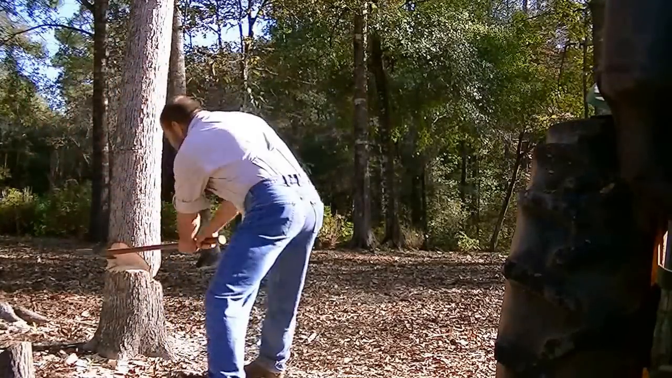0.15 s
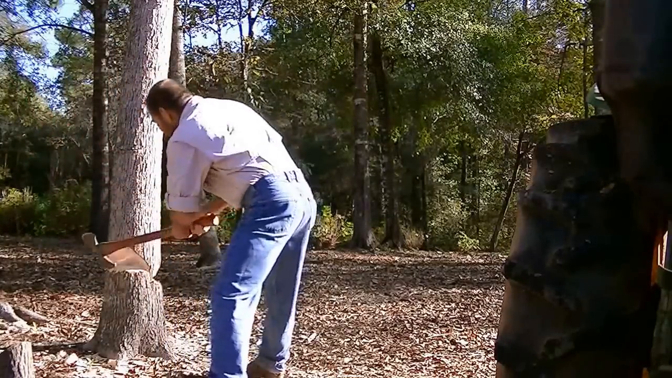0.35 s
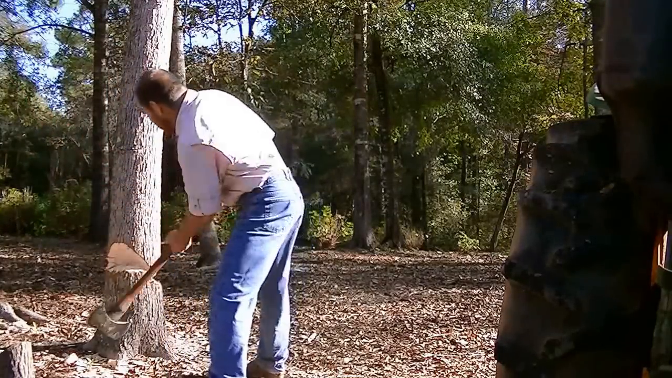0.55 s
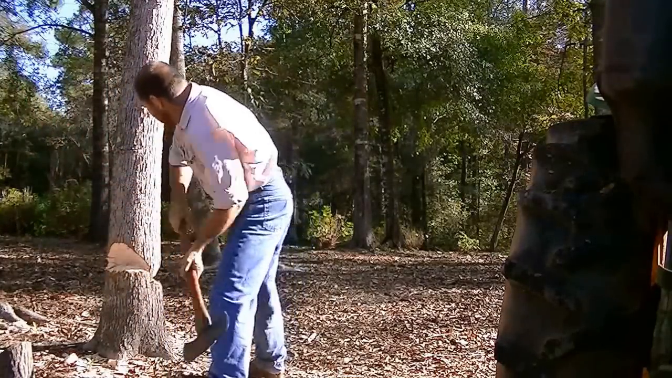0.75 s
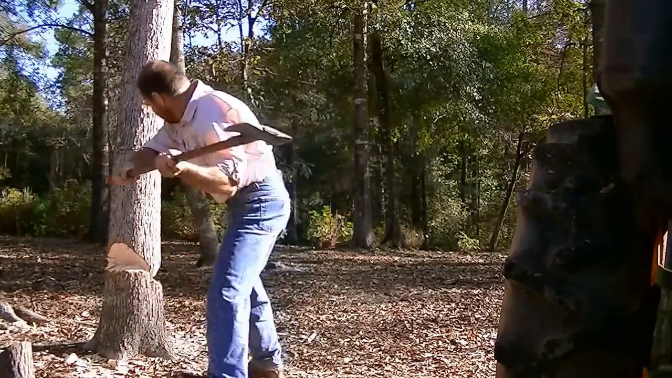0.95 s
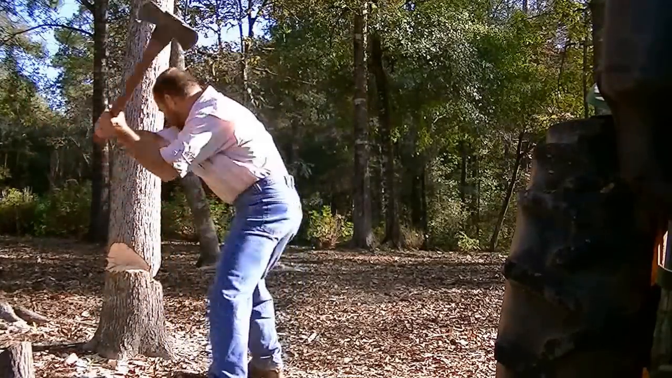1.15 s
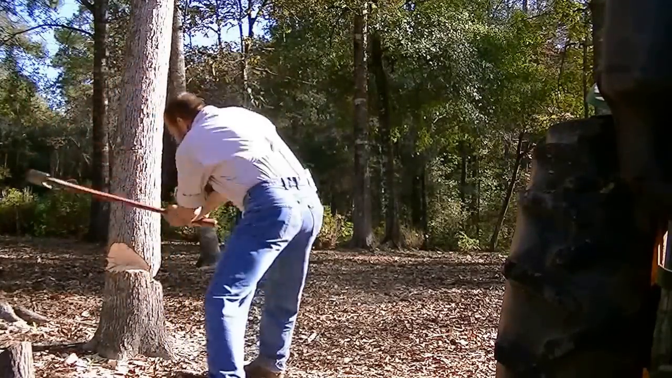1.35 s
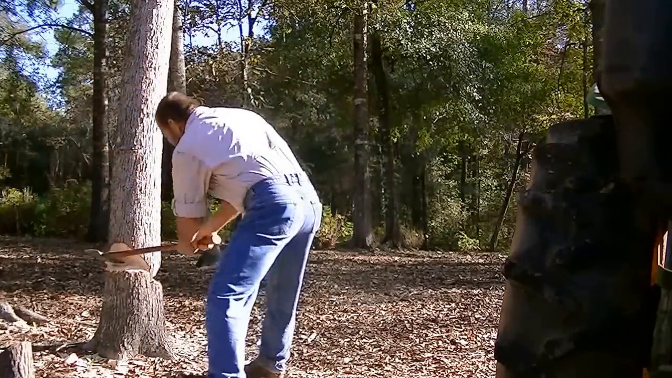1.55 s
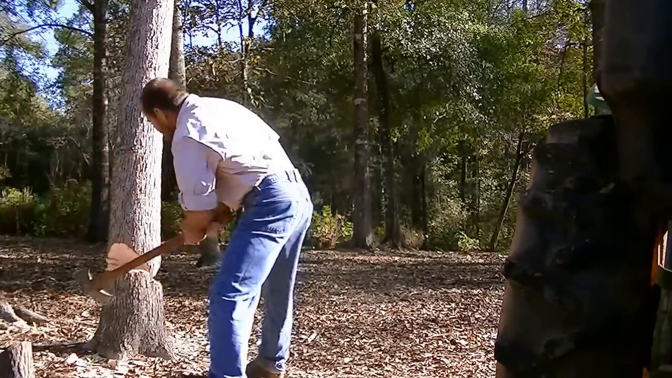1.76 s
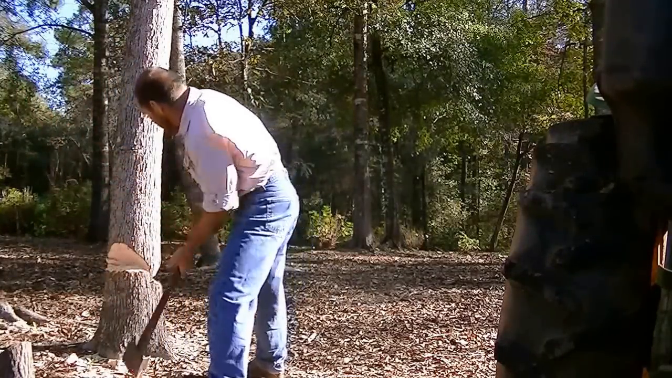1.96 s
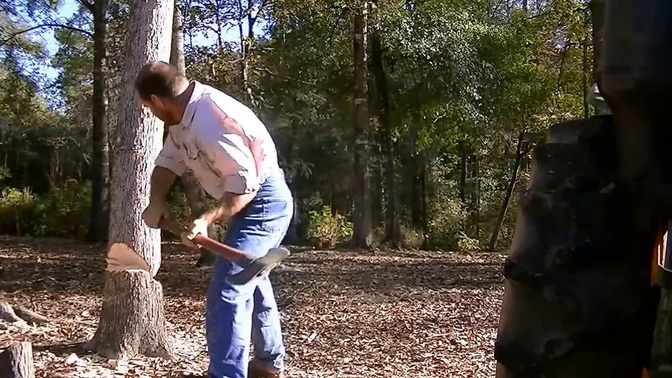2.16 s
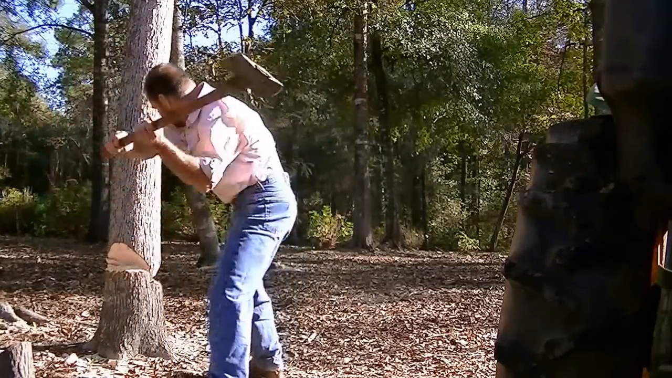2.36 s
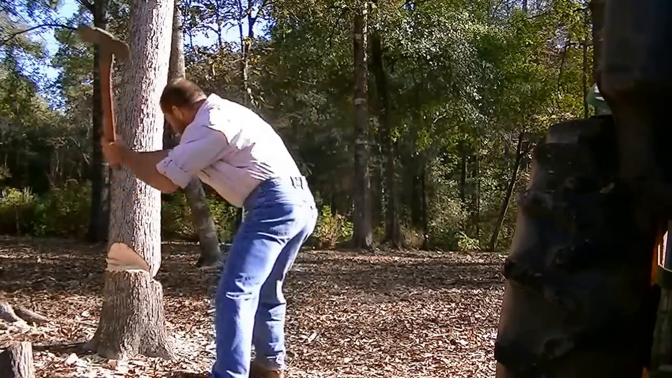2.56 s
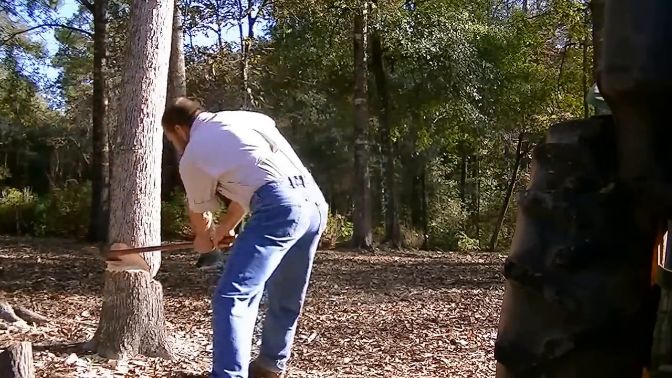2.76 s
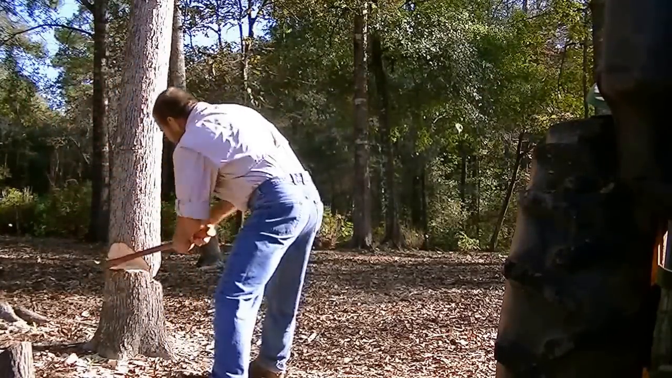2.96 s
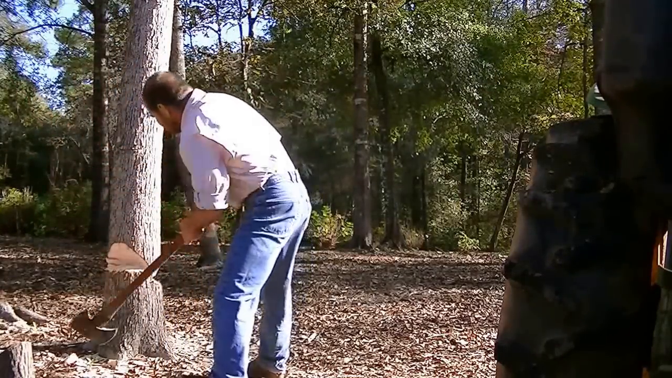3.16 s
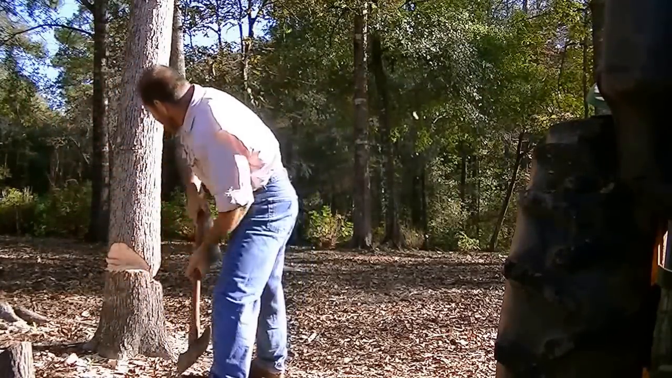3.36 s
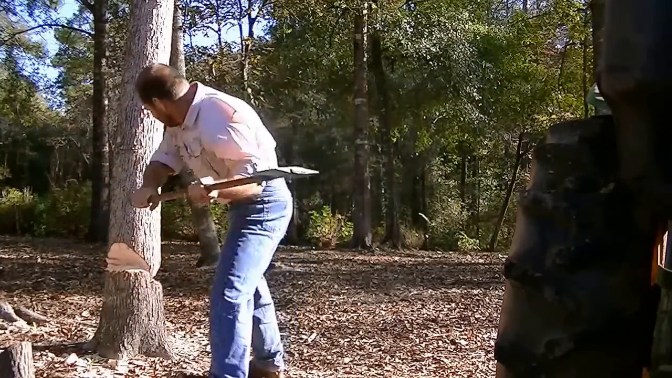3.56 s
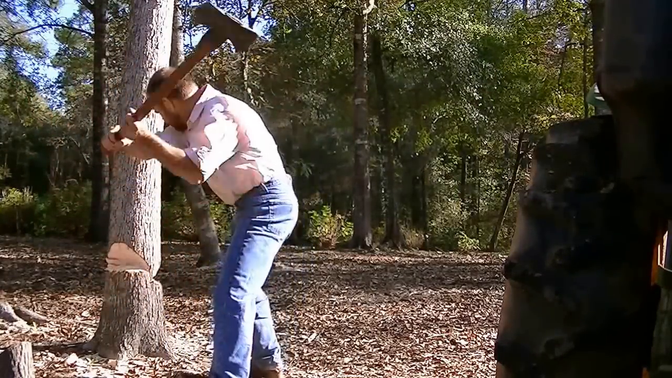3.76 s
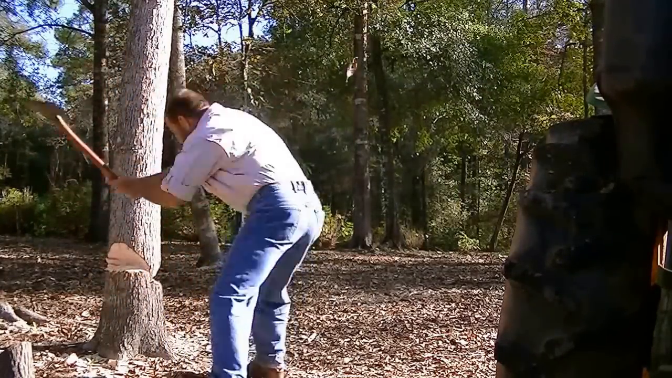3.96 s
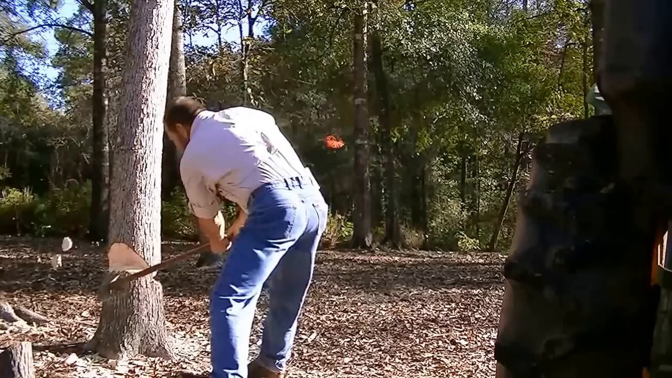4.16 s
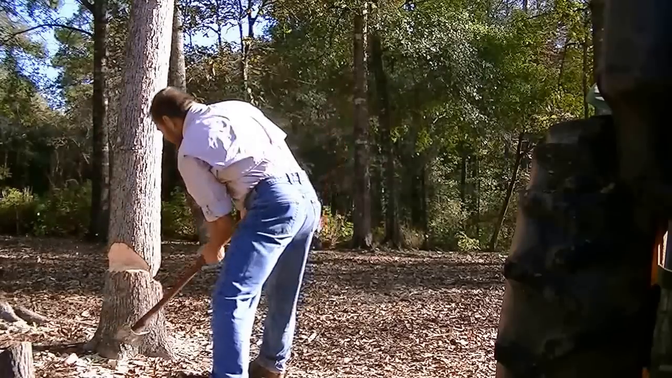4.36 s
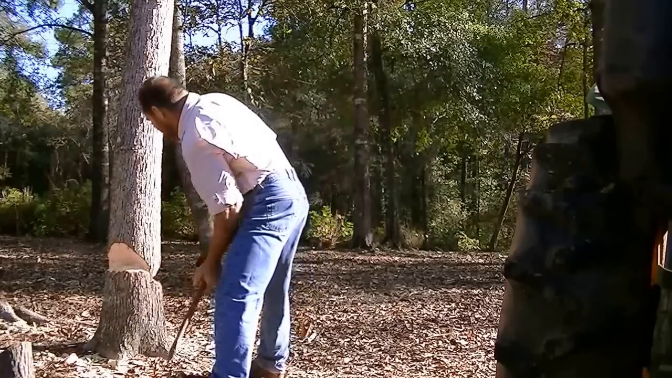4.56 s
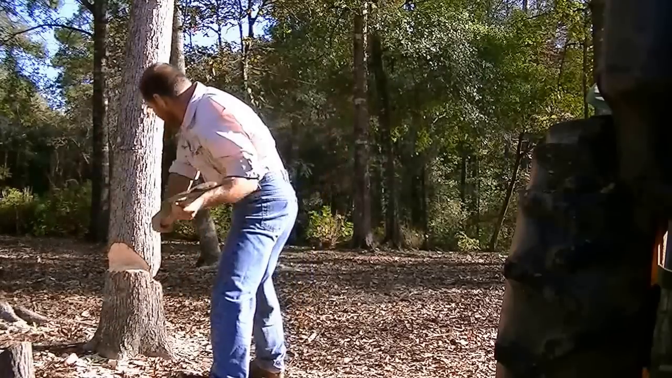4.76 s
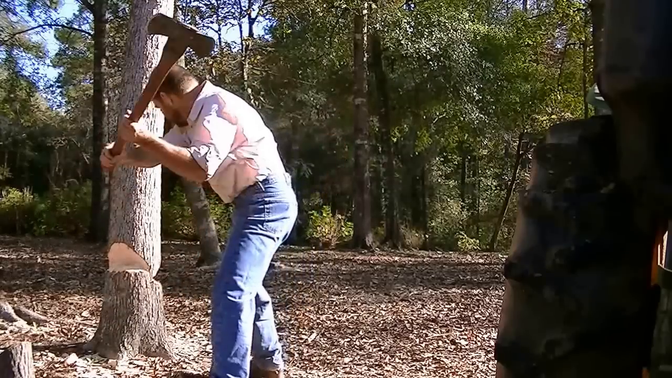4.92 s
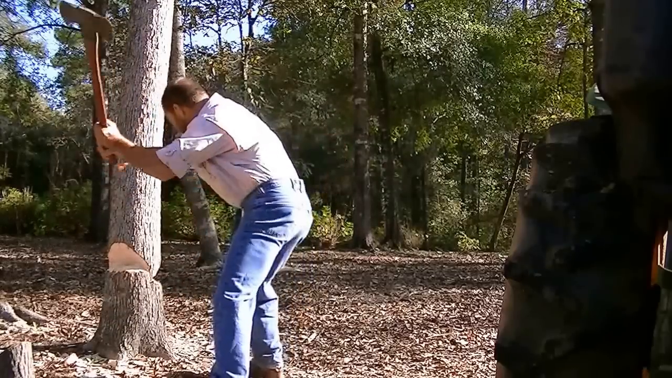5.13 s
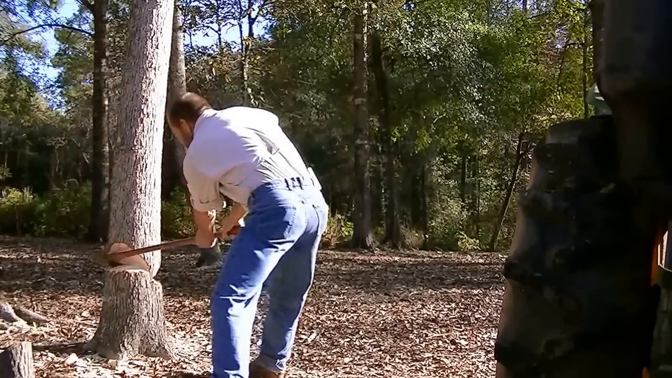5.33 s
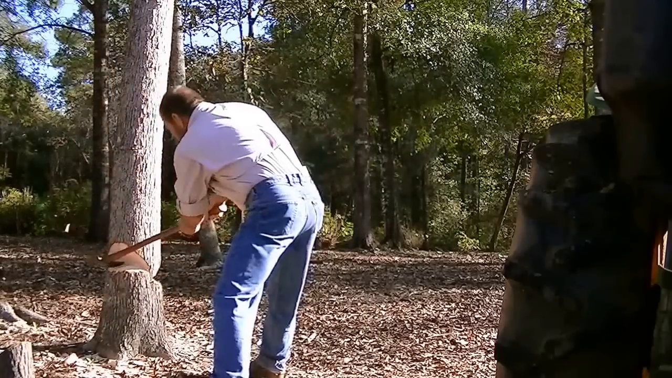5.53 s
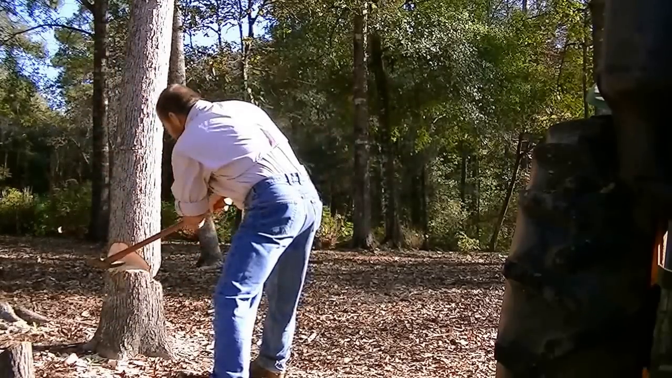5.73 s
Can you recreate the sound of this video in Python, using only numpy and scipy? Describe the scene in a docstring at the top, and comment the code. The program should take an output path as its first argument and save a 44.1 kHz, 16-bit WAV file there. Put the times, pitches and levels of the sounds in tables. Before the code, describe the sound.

A quiet wood, heard through one microphone: low soft air, faint leaf hush and a thin bird note at the very start. At 0.13 s an axe bites into a standing trunk with a loud, dry, ringing crack, slightly distorted, with snapping fibres, a short thud and a faint diffuse forest echo. The background drops, then swells towards the next blow. Around 1.1 s small birds flutter and whistle over a light rustle. Further blows land at 1.46, 2.79, 4.13 and 5.38 s, each differing slightly in pitch; the third and fourth have more steel ring, the last a heavier thud. The blade knocks and scrapes loose at 1.64 and 2.98 s. Chips crackle in dry leaves near 3.0, 3.5 and 4.6-4.8 s, with brief chirps around 3.3 and 3.9 s. Clothes and litter rustle most near 5 s, and a low bird whistle meets the last blow. Silence from 5.6 s.

```python
"""A bird's note over a hushed wood, then at once an axe bites into the notch of a standing tree, five blows in
all, each loud enough to overload the microphone. Each blow is a ringing chip with a burst of snapping fibres,
a thud and ring of the trunk, a ping of steel and an answer of noise from the forest. The blade is tugged free
as struck modes and a scrape, chips crackle into dry leaves, clothes and litter rustle as grainy noise around
the lifts, and small birds whistle in gliding sines. The background swells toward each blow and sinks after it."""
import sys
import numpy as np
from scipy import signal
from scipy.fft import rfft, irfft
from scipy.io import wavfile
from scipy.ndimage import map_coordinates

SR = 44100
rng = np.random.default_rng(int(sys.argv[2]) if len(sys.argv) > 2 else 0)


def unload_audio(sound):
    """Save the sound as a 16-bit wav file, at the path given as the first command line argument."""
    columns = np.transpose(np.atleast_2d(sound))
    # keep every value between -1 and 1, then stretch to whole-number steps
    steps = np.round(np.clip(columns, -1, 1) * 32767)
    wavfile.write(sys.argv[1], SR, steps.astype(np.int16))


N = 255336

# Axe blows on the trunk: t/s, bite length/s, chip low f/Hz, level/dB, chip mid f/Hz, level/dB,
# chip high f/Hz, level/dB, splinter f/Hz, level/dB, crack level/dB, crack treble/dB (full from 10 kHz up),
# thud f/Hz, thud level/dB, trunk level/dB, steel level/dB, forest wash level/dB, echo f/Hz, echo level/dB
AXE_BLOWS = [(.1274, .0034, 1532, -11.5, 1870, -4, 2897, -4, 7270, -10, -6.5, 2, 250, -25, -37.5, -62.5, -53, 1729, -64.5),
             (1.457, 0.0052, 1342, -10.5, 1782, -8, 2645, -8, 2066, -10, -5.5, 1.5, 228.5, -19, -42.5, -55.5, -54.5, 1482, -65),
             (2.7895, .0022, 1215, -13.5, 1720, -4, 2400, -7, 3840, -7.5, -6, -0.5, 169.9, -16.5, -24.5, -40, -47.5, 1720, -62.5),
             (4.1319, .0025, 1154, -7.5, 1450, -5, 2202, -6, 3540, -10, -6, -10.5, 203, -17.5, -32.5, -38, -48, 2347, -56),
             (5.3758, 0.0023, 1193, -5, 2064, -8, 2656, -2.5, 4610, -6.5, -4.5, -1.5, 273.4, -11, -30, -55.5, -54.5, 1150, -62.5)]
# Ringing modes of the axe head: f/Hz, level/dB, t60/s
STEEL_MODES = [(2530, -5, 0.15), (4600, -5, 0.15), (5820, 4.5, 0.13), (7340, -15.5, .1)]
# Lifts of the axe that stir clothes and leaf litter: t of the peak/s, rise and fall time constant/s, level/dB
AXE_LIFTS = [(1.08, .09, -66), (2.43, .11, -69), (3.37, 0.079, -64), (3.76, 0.097, -56), (4.98, .12, -47.5)]
# Colour of stirred leaves: f/Hz, relative level per Hz/dB
LEAF_COLOUR = [(1500, -23.5), (3000, -2.5), (4800, 0.5), (7000, -5.5), (9000, -10), (13000, -27)]
# Colour of the higher swish of cloth and foliage: f/Hz, relative level per Hz/dB
SWISH_COLOUR = [(5000, -26.5), (8000, -3.5), (10000, 1), (12000, 0), (15500, -6.5), (16000, -37.5)]
# Colour of scraped wood and of scatter off the ground: f/Hz, relative level per Hz/dB
SCATTER_COLOUR = [(300, -14.5), (900, 1), (1400, 4.5), (2400, 1.5), (3500, -6), (5500, -10.5), (8000, -16),
                  (15000, -23), (16000, -45)]


def amp(db):
    """Amplitude factor of a level in dB."""
    return 10 ** (np.asarray(db) / 20)


def unit(x):
    """Scale a sound to rms 1."""
    return x / np.sqrt(np.mean(x ** 2) + 1e-20)


def along(points, hz):
    """Interpolate (f/Hz, value) points on a logarithmic frequency axis."""
    f, value = np.transpose(points)
    return np.interp(np.log(hz + 1), np.log(f + 1), value)


def fade(t, t60):
    """Exponential decay from t = 0, down 60 dB after t60 seconds; it holds 1 before t = 0."""
    return np.exp(-np.log(1000) * np.maximum(t, 0) / t60)


def onset(t, seconds):
    """Exponential approach from 0 to 1 with a time constant in seconds."""
    return 1 - np.exp(-t / seconds)


def add(track, s, sound):
    """Mix a sound into the track at time s."""
    start = max(round(s * SR), 0)
    track[start:start + len(sound)] += sound[:max(len(track) - start, 0)]


def wobble(rate, size):
    """A smooth random curve through rate knots a second."""
    knots = rng.standard_normal(int(size * rate / SR) + 4)
    return map_coordinates(knots, [np.arange(size) * rate / SR])


def noise(spectrum, size):
    """Coloured noise of rms 1."""
    colour = amp(along(spectrum, np.fft.rfftfreq(size, 1 / SR)))
    return unit(irfft(rfft(rng.standard_normal(size)) * colour, size))


def grainy(spectrum, grain_db):
    """Noise of rms 1, broken into fine grains that come in clumps."""
    grains = amp(grain_db * wobble(1100, N) + .9 * wobble(99, N))
    return unit(grains * noise(spectrum, N))


def ring(modes, t):
    """Damped modes of alternating sign, struck at slightly new strengths each time."""
    strength = amp(rng.standard_normal(len(modes)))
    out = np.zeros(len(t))
    for k, (hz, db, t60) in enumerate(modes):
        out += (-1) ** k * strength[k] * amp(db) * fade(t, t60) * np.sin(2 * np.pi * hz * t)
    return out


def surroundings():
    """Low air, hush and rustle rise together out of a lull, hold until the blow lands and then sink quickly."""
    # Swells of the background: t when full/s, level/dB
    background_swells = [(0, 0), (1.41, -1.5), (2.771, -2.5), (3.519, 0.5), (5.001, 0)]
    # Colour of the low air: f/Hz, relative level per Hz/dB
    low_colour = [(15, -61), (25, -28.5), (70, -13.5), (90, -0.5), (102, 1), (177, -2), (281, -11),
                  (384, -12.5), (500, -16), (650, -44), (1100, -120)]
    # Colour of the wood's hush: f/Hz, relative level per Hz/dB
    hush_colour = [(150, -22.5), (330, -2), (700, 1), (1100, -1), (1800, -3), (3000, -6), (4500, -13.5),
                   (7000, -22), (12000, -42)]
    rise_db_per_s, fall_db_per_s, lull_db = 31.5, 125, -20
    t = np.arange(N) / SR
    swells = []
    for (full_s, db), blow in zip(background_swells, AXE_BLOWS):
        rise = rise_db_per_s * np.maximum(full_s - t, 0)
        fall = fall_db_per_s * np.maximum(t - blow[0], 0)
        swells.append(amp(db - rise - fall))
    level = np.hypot(amp(lull_db), np.max(swells, axis=0))
    air = amp(-50) * noise(low_colour, N) + amp(-51.5) * noise(hush_colour, N)
    leaves = amp(-58) * grainy(LEAF_COLOUR, grain_db=2.0) + amp(-63) * grainy(SWISH_COLOUR, grain_db=2.5)
    return level * (air + leaves)


def birds():
    """Thin fluttering whistles that glide and settle on a pitch, smeared by the nearest trees."""
    # Bird notes: t/s, length/s, start f/Hz, end f/Hz, level/dB (before the offset and flutter below)
    bird_notes = [(0, 0.12, 3020, 3049, -50.5), (1.081, 0.062, 7206, 7585, -54),
                  (1.074, 0.076, 4820, 4670, -58), (1.082, .26, 3100, 3023, -59.5),
                  (1.122, .04, 7930, 8750, -54), (1.125, .18, 2320, 2298, -57),
                  (1.139, 0.054, 5700, 5270, -56), (1.155, 0.029, 4905, 4200, -55),
                  (1.203, .15, 4500, 4595, -56.5), (3.294, 0.024, 10500, 7800, -54),
                  (3.356, 0.023, 5360, 4400, -50.5), (3.86, 0.12, 6740, 7530, -53.5),
                  (5.14, .18, 1158, 1161, -55.5), (5.359, 0.22, 1175, 1155, -52.5)]
    peak_share = .3  # share of a note spent rising
    echo_db, echo_t60_s = -.5, 0.85
    out = np.zeros(N)
    for s, length, start_hz, end_hz, db in bird_notes:
        u = np.linspace(0, 1, int(length * SR))
        glide = end_hz + (start_hz - end_hz) * (1 - u) ** 3
        hz = glide * (1 + 40 / end_hz * wobble(200, len(u)))
        shape = np.sqrt(np.interp(u, [0, peak_share, 1], [0, 1, 0]))
        flutter = amp(db - 2.5 + 3.3 * wobble(70, len(u)))
        add(out, s, flutter * shape * np.sin(2 * np.pi * np.cumsum(hz) / SR))
    t = np.arange(SR) / SR
    tail = rng.standard_normal(len(t)) * fade(t, echo_t60_s)
    return out + amp(echo_db) * signal.fftconvolve(out, tail / np.linalg.norm(tail))[:N]


def lifts():
    """Each time the axe is raised, leaf litter and clothes rustle up and die away."""
    cloth_db = -4.5  # relative to the stirred leaves
    t = np.arange(N) / SR
    motion = sum(amp(db) * np.exp(-np.abs(t - s) / width) for s, width, db in AXE_LIFTS)
    leaves = grainy(LEAF_COLOUR, grain_db=3.5)
    cloth = amp(cloth_db) * grainy(SWISH_COLOUR, grain_db=4.0)
    return motion * (leaves + cloth)


def twigs():
    """Three small twigs snap at random around each lift: rows like those of the fallen chips."""
    spread = .6  # standard deviation of their times, as a share of the lift's time constant
    level_db, t60_s = 4.5, 0.048  # level relative to the stirred leaves
    rows = []
    for s, width, db in AXE_LIFTS:
        for when, strength in rng.standard_normal(size=(3, 2)):
            rows.append((s + spread * width * when, db + level_db + 3 * strength, t60_s, 0))
    return rows


def chips():
    """Chips land and twigs snap in dry leaves: short clumps of crackle."""
    # Chips and twigs in the leaf litter: t/s, level/dB, t60/s, treble tilt/dB per decade about 1 kHz
    litter_hits = [(.709, -60, 0.046, -2), (1.231, -49, 0.1, 1), (3.003, -37.5, 0.028, -13),
                   (3.442, -44, 0.052, 2), (3.565, -37.5, 0.052, -4), (4.561, -46.5, 0.16, 0),
                   (4.676, -35.5, 0.079, -1.5), (4.799, -41, 0.026, 21)]
    # dry leaves: f/Hz, relative level per Hz/dB
    leaf = [(150, -4.0), (900, -2.5), (2000, 0.5), (3800, 2.0), (6000, -1.5), (9000, -3), (12000, -8.5),
            (15500, -17), (16000, -36)]
    out, t = np.zeros(N), np.arange(SR // 4) / SR
    for s, db, t60, treble_db in litter_hits + twigs():
        colour = [(hz, level + treble_db * np.log10(hz / 1000)) for hz, level in leaf]
        clumps = amp(3.1 * wobble(905, len(t)))
        crackle = unit(noise(colour, len(t)) * clumps)
        add(out, s - .001, amp(db) * crackle * fade(t, t60) * onset(t, 0.00065))
    return out


def tugs():
    """The blade lets go of the notch with a small knock, a scrape and a ping of the steel."""
    # Tugs that free the blade: t/s, knock level/dB, scrape level/dB, steel level/dB
    blade_tugs = [(1.6427, -49, -44, -61.5), (2.9819, -35, -42, -63)]
    # Modes of handle and blade as they come loose: f/Hz, level/dB, t60/s
    handle_modes = [(171.5, -11, 0.19), (607, -7, 0.084), (804, -5.5, 0.047), (994, 2, 0.019),
                    (1740, -5, .025), (2754, -3, 0.045)]
    out, t = np.zeros(N), np.arange(SR // 4) / SR
    for s, knock_db, scrape_db, steel_db in blade_tugs:
        scrape = amp(scrape_db) * noise(SCATTER_COLOUR, len(t)) * fade(t, 0.0465)
        knock = amp(knock_db) * ring(handle_modes, t)
        ping = amp(steel_db) * ring(STEEL_MODES, t)
        add(out, s, (knock + ping + scrape) * onset(t, 0.00073))
    return out


def forest_tail(x):
    """Among the trees each frequency of a noise dies at its own speed."""
    # Decay among the trees: f/Hz, t60/s
    forest_decay = [(150, 1.1), (800, 1.1), (2000, 2), (5000, 1.3), (8000, 1.5), (14000, .35)]
    hz, t, z = signal.stft(x, SR, nperseg=256)
    return signal.istft(z * fade(t, along(forest_decay, hz)[:, None]), SR, nperseg=256)[1]


def forest_answer(t, wash_db, echo_hz, echo_db):
    """Far trunks return a broad wash and an uneven band around one note, different for each blow."""
    # Colour of the returned wash: f/Hz, relative level per Hz/dB
    wash_colour = [(100, -8.5), (500, -5), (1000, -1.5), (1700, -0.5), (3000, -1.5), (4200, -6),
                   (5500, -6.5), (7500, -11), (10000, -23.5), (15000, -34)]
    band = noise([(echo_hz / 2, -40), (0.69 * echo_hz, -14), (echo_hz, 0),
                  (1.18 * echo_hz, -14), (2 * echo_hz, -40)], SR)
    note = amp(echo_db) * band * fade(t - .25, 1.9)
    wash = amp(wash_db + 1.0 * wobble(160, SR)) * forest_tail(noise(wash_colour, SR))[:SR]
    return (wash + note) * onset(t, 0.013)


def trunk_ring(t):
    """The standing trunk answers a blow with a dull boom of noise and its ringing modes."""
    # Modes of the standing trunk: f/Hz, level/dB, t60/s
    stem_modes = [(172, -3.5, 0.16), (326, -1, 0.22), (372, 0.5, 0.096), (436, -5.5, 0.11), (531, 2, 0.14),
                  (713, -7.5, .14)]
    # Colour of its dull boom: f/Hz, relative level per Hz/dB
    boom_colour = [(50, -16.5), (130, -1), (320, 0), (550, 0), (900, -9), (1500, -16), (4000, -41.5)]
    boom = 0.66 * noise(boom_colour, SR) * fade(t, 0.26)
    return (boom + 0.42 * ring(stem_modes, t)) * onset(t, 0.0018)


def split(t, length, modes):
    """The splitting chip is driven while the blade sinks in, at no steady pitch; then it rings out."""
    out = np.zeros(len(t))
    for hz, db in modes:
        drift = t + .00006 * wobble(600, len(t))
        # higher modes are let go sooner and die faster
        driven = fade(t - length * (1500 / hz) ** 0.37, 0.012 * (1500 / hz) ** .5)
        life = driven + 0.057 * fade(t, 0.054)
        out += amp(db) * life * np.sin(2 * np.pi * hz * (drift - .0012))
    return out


def crack(t, length, treble_db):
    """Fibres snap in one dense burst of even spectrum, then tear more weakly until the blade stops."""
    # Colour of the snapping fibres: f/Hz, relative level per Hz/dB
    fibre_colour = [(100, -13), (700, -9), (1200, 3.5), (2100, 2.5), (2900, 2.5), (3400, 1.5), (4300, 1),
                    (5300, 2), (6600, 0), (7450, 0), (8300, -3), (10800, -6), (11600, -0.5), (13500, -12.5),
                    (16500, -15)]
    size = len(t)
    snap = np.clip(t / 0.00048, 0, 1) * fade(t - .0014, 0.0041)
    hz = np.fft.rfftfreq(size, 1 / SR)
    treble = treble_db * np.clip(np.log2(hz / 2500 + 1e-9) / 2, 0, 1)  # from 2.5 kHz, full at 10 kHz
    colour = amp(along(fibre_colour, hz) + treble)
    burst = snap * rng.standard_normal(size)
    for _ in range(3):  # impose the exact spectrum, then the envelope, in turn
        burst = snap * irfft(colour * np.exp(1j * np.angle(rfft(burst))), size)
    burst *= np.linalg.norm(snap) / np.linalg.norm(burst)
    tear = unit(irfft(colour * rfft(rng.standard_normal(size)), size)) * fade(t - length, .008)
    return 1.15 * burst + .3 * tear


def chops():
    """Each blow: chip and crack, thud of the trunk, ring of the steel, scatter off the ground, forest's answer."""
    out, t = np.zeros(N), np.arange(SR) / SR
    brief = t[:SR // 10]
    for (s, length, low_hz, low_db, mid_hz, mid_db, high_hz, high_db, splinter_hz, splinter_db,
         crack_db, treble_db, thud_hz, thud_db, trunk_db, steel_db, wash_db, echo_hz, echo_db) in AXE_BLOWS:
        modes = [(low_hz, low_db), (mid_hz, mid_db), (high_hz, high_db), (splinter_hz, splinter_db)]
        chip = split(brief, length, modes) * onset(brief, .0004)
        add(out, s, chip + amp(crack_db) * crack(brief, length, treble_db))
        # the push of the blade rocks the trunk in two short low modes
        first_mode = np.sin(2 * np.pi * thud_hz * t) * fade(t, 0.037)
        second_mode = .35 * np.sin(2 * np.pi * 400 * t) * fade(t, .045)
        thud = amp(thud_db) * (first_mode - second_mode)
        trunk = amp(trunk_db) * trunk_ring(t)
        steel = amp(steel_db) * ring(STEEL_MODES, t) * (1 + 0.59 * wobble(82, SR))
        scatter_decay = amp(-19.5) * fade(t, 0.053) + amp(-46.5) * fade(t, 0.42)
        ground = noise(SCATTER_COLOUR, SR) * scatter_decay * onset(t, 0.00033)
        answer = forest_answer(t, wash_db, echo_hz, echo_db)
        add(out, s, thud + trunk + steel + ground + answer)
    return out


def scene():
    """Everything as it reaches one microphone."""
    return (surroundings() + birds() + lifts() + chips() + tugs() + chops())[None]


def record(dry):
    """Loud blows saturate the input, the sound stops just before the end, and a low-pass limits the band."""
    ceiling, end_s, top_hz = .93, 5.6, 16500
    clipped = dry / (1 + np.abs(dry / ceiling) ** 6) ** (1 / 6)
    running = np.clip((end_s - np.arange(N) / SR) / .01, 0, 1)  # 10 ms fade to silence
    low_pass = signal.firwin(301, top_hz, fs=SR, window="blackmanharris")
    return signal.fftconvolve(clipped * running, low_pass[None], mode="same")


dry = scene()
out = record(dry)
unload_audio(out)
```